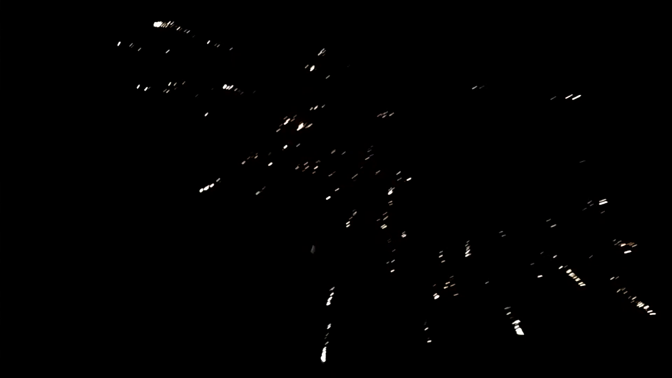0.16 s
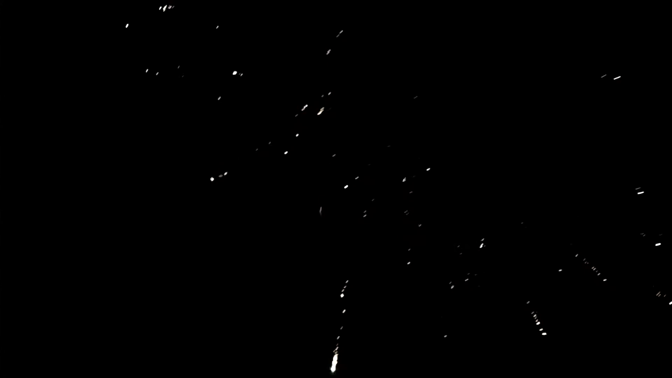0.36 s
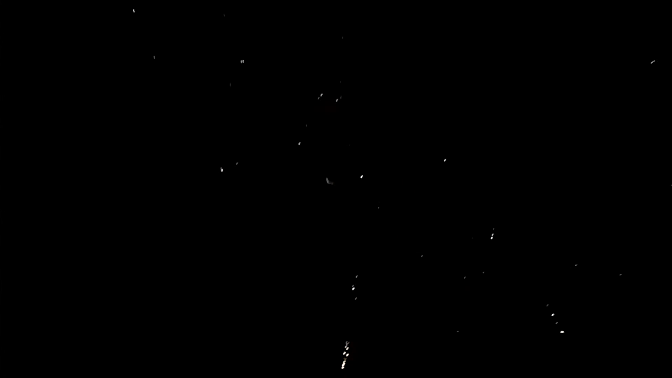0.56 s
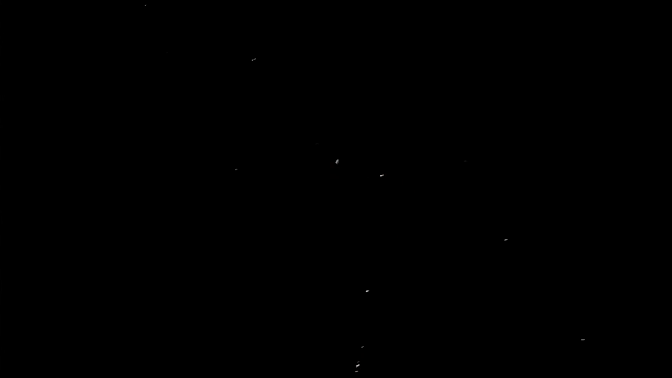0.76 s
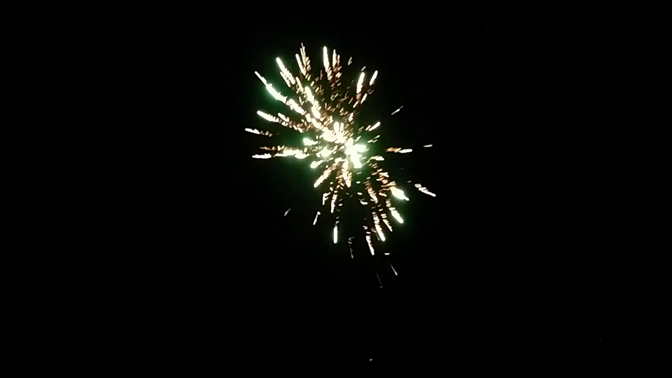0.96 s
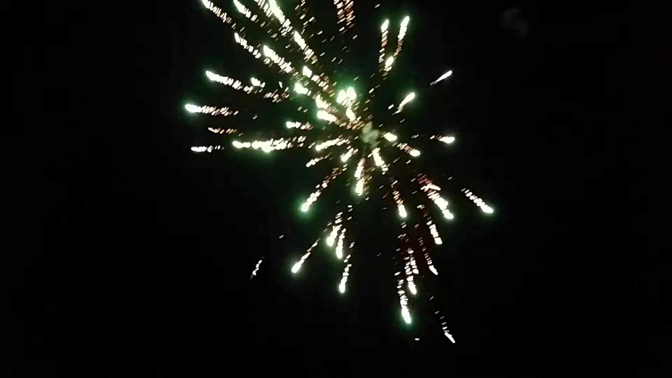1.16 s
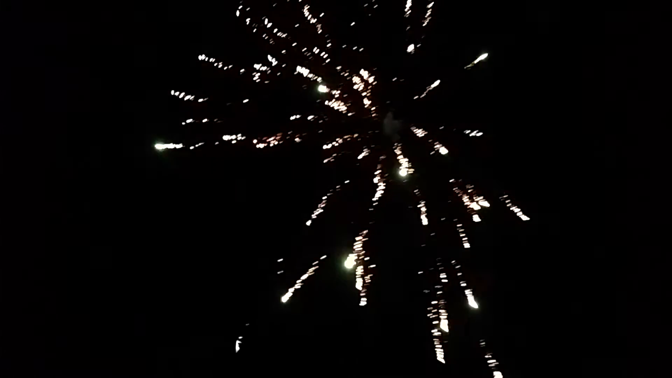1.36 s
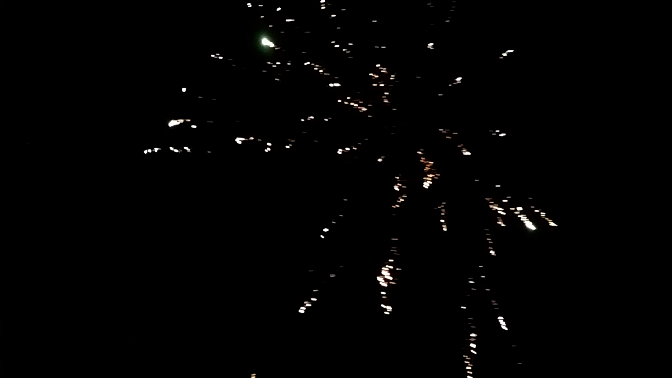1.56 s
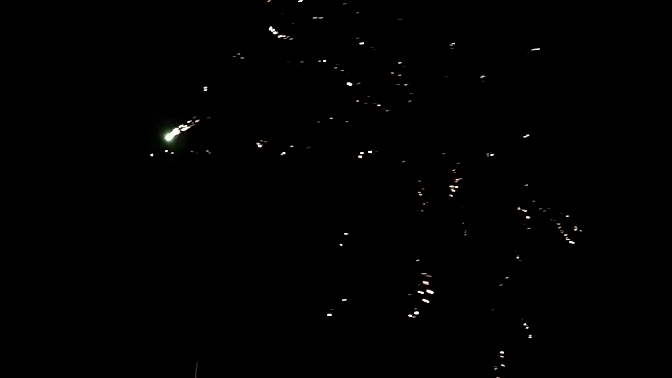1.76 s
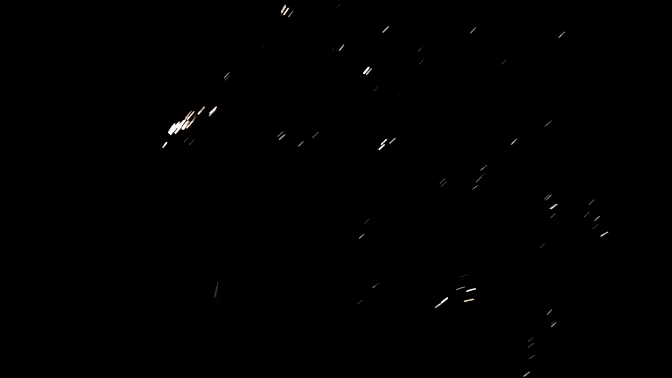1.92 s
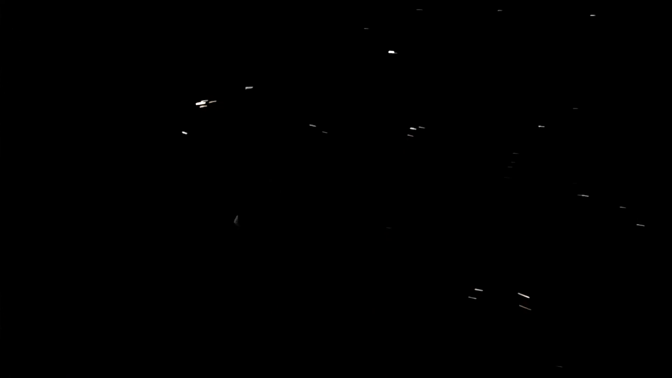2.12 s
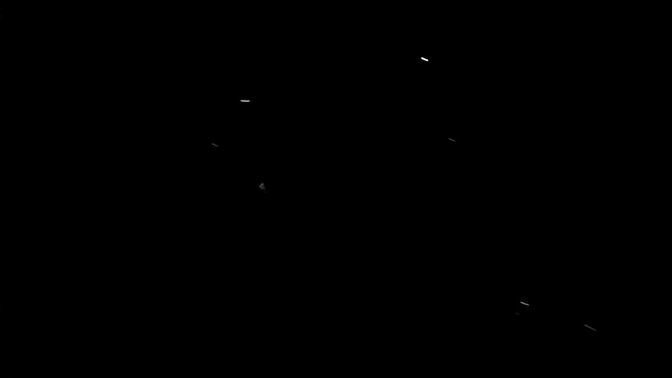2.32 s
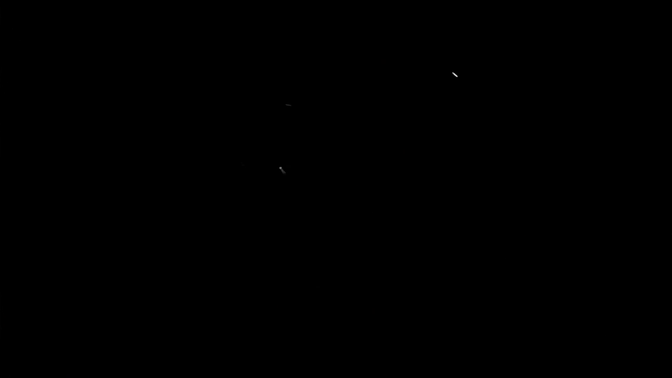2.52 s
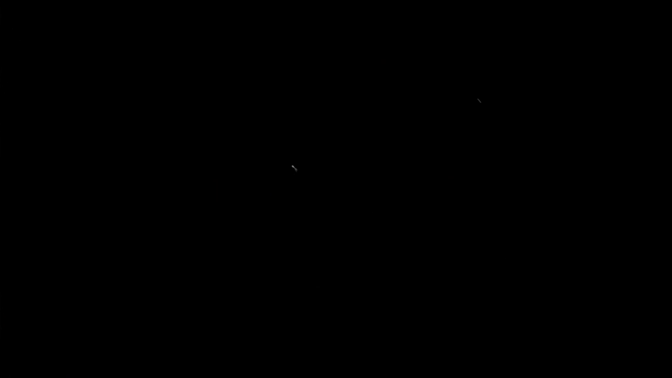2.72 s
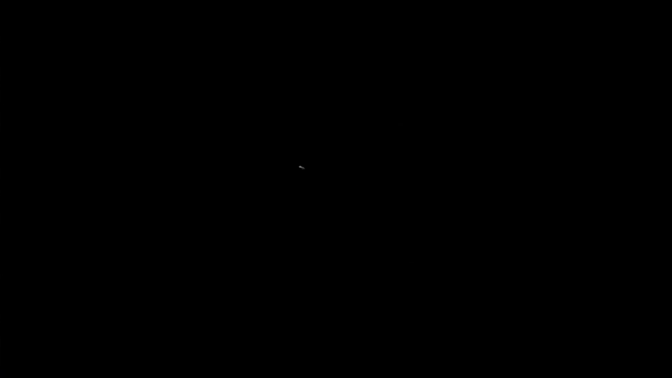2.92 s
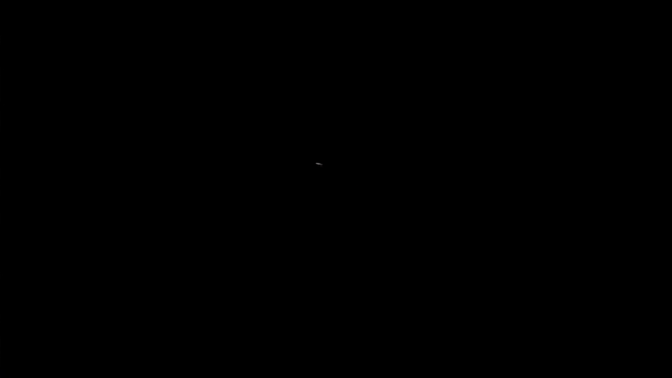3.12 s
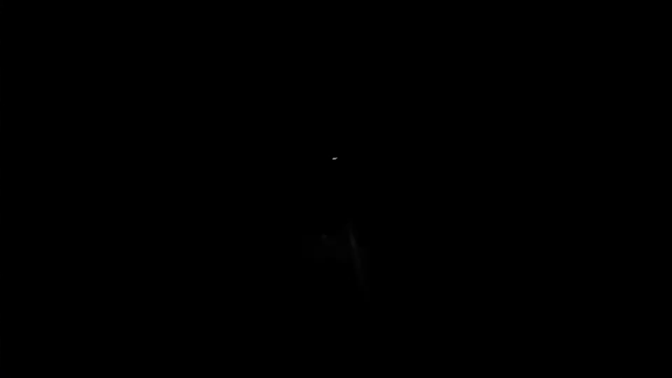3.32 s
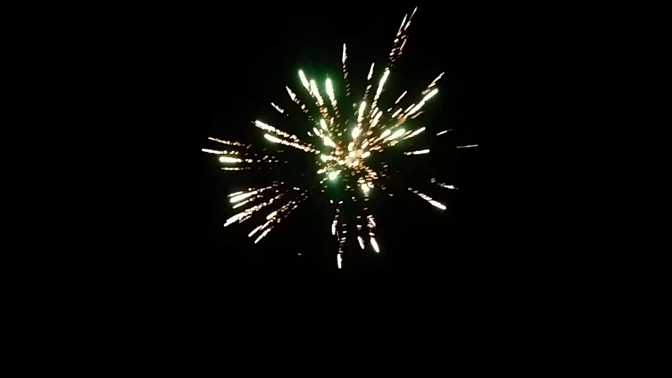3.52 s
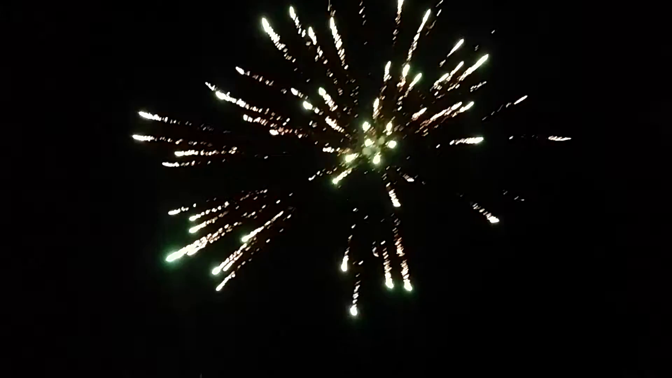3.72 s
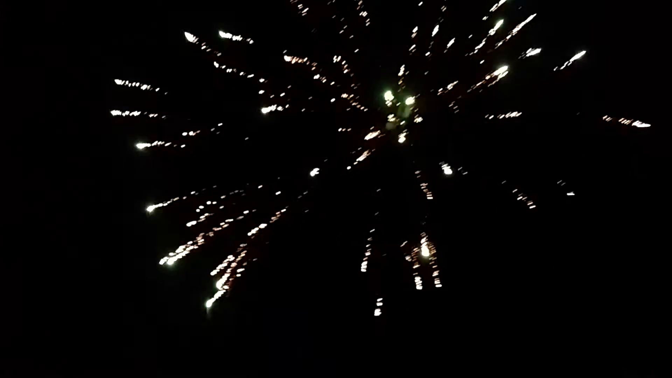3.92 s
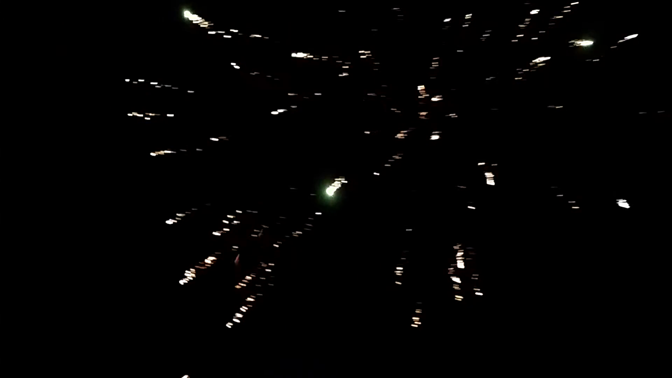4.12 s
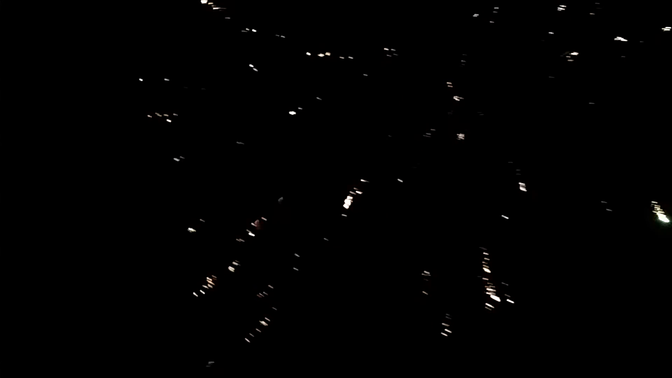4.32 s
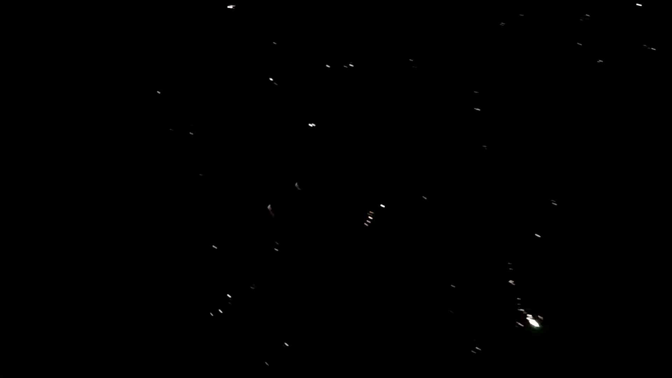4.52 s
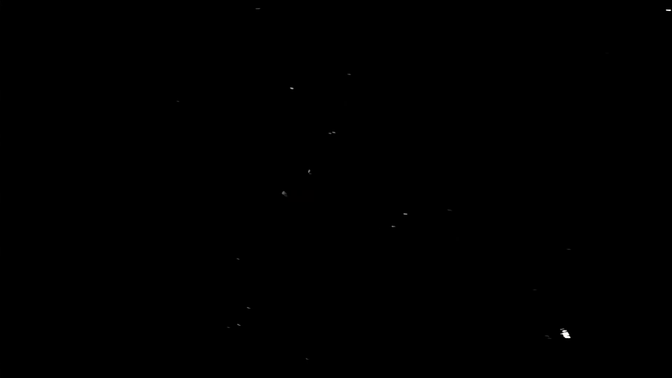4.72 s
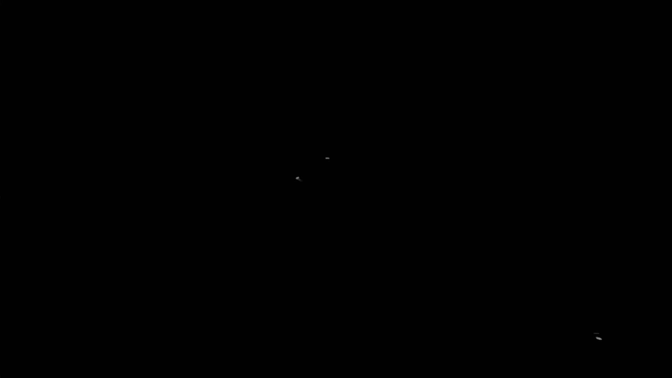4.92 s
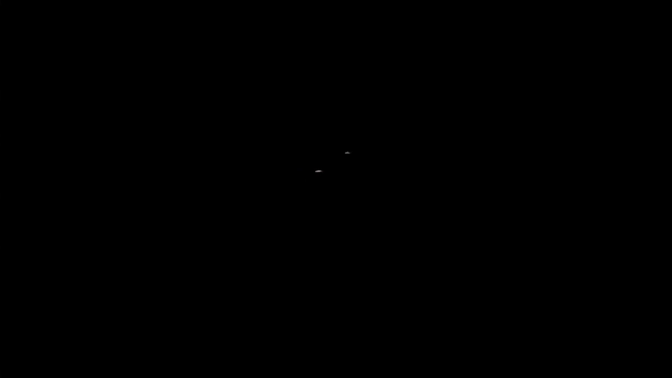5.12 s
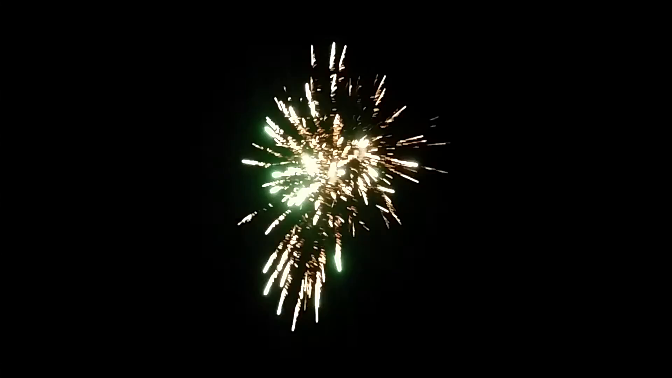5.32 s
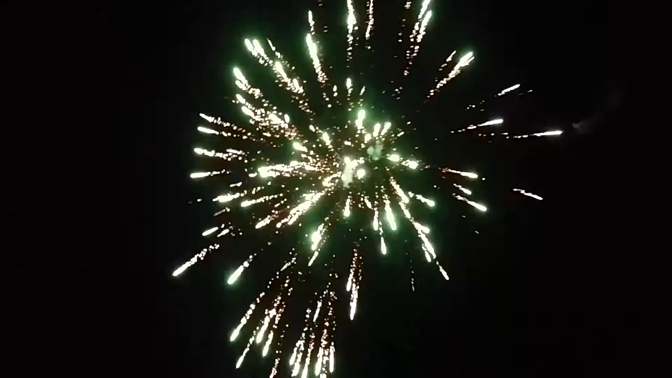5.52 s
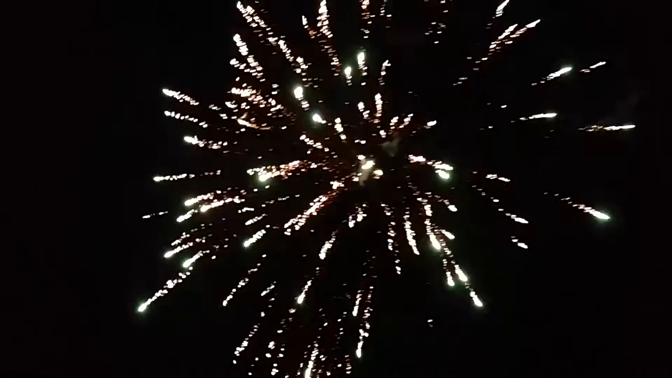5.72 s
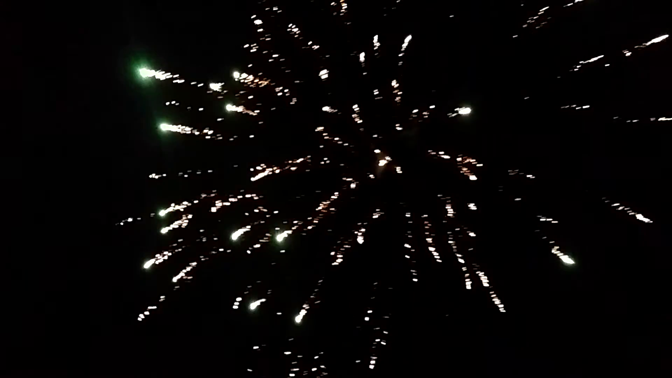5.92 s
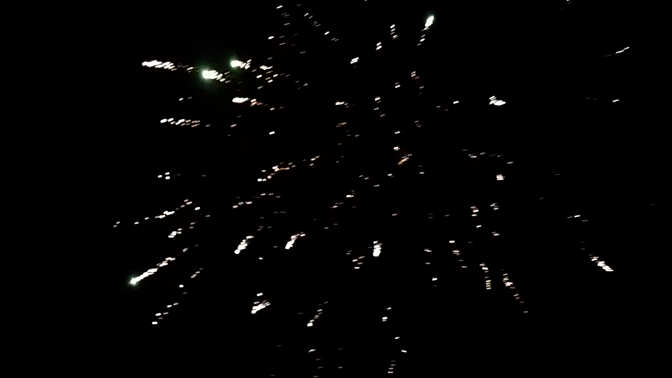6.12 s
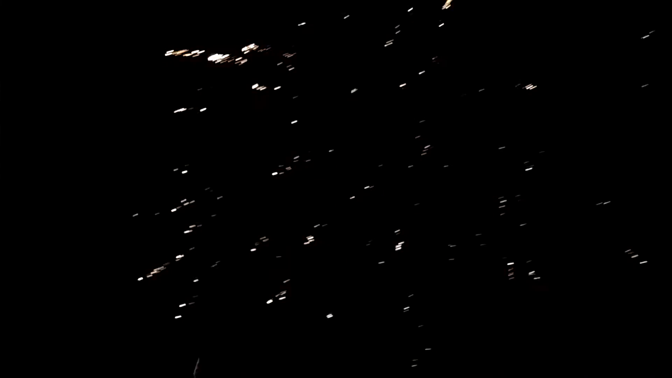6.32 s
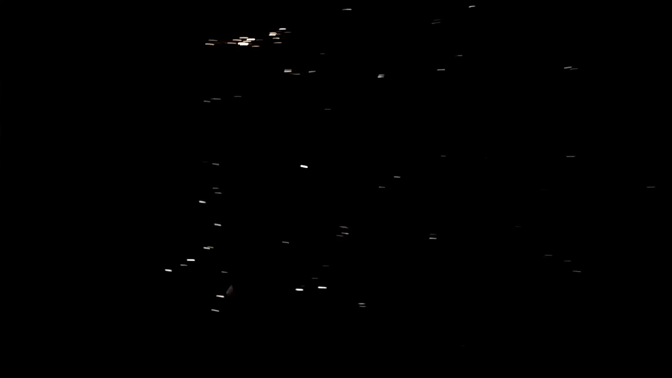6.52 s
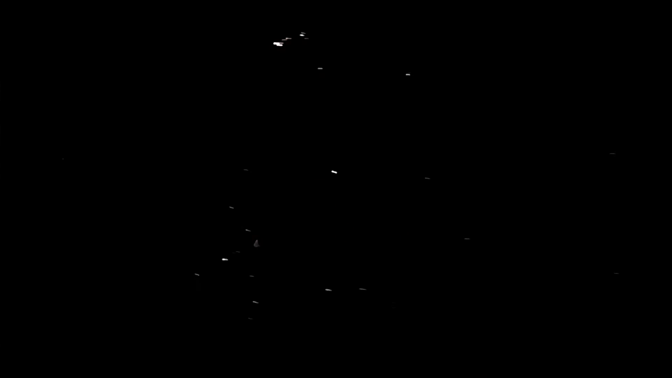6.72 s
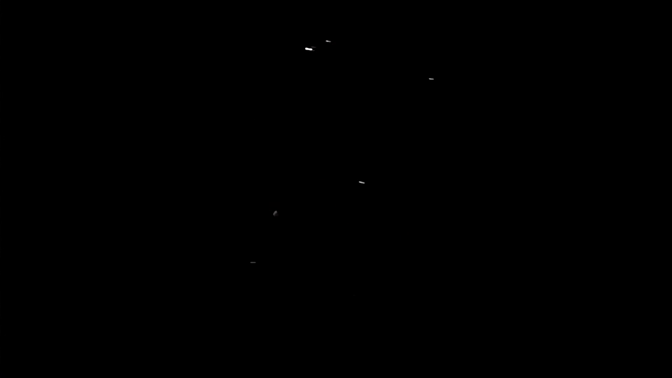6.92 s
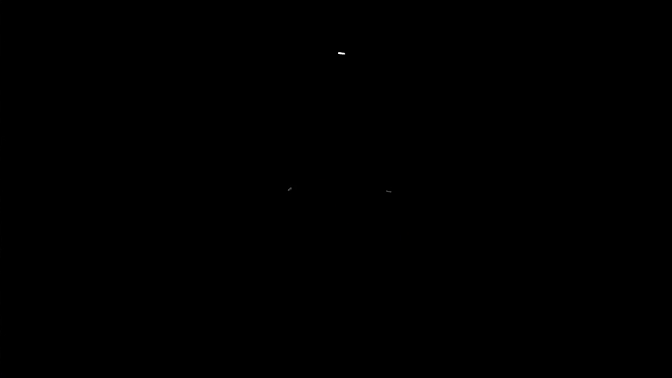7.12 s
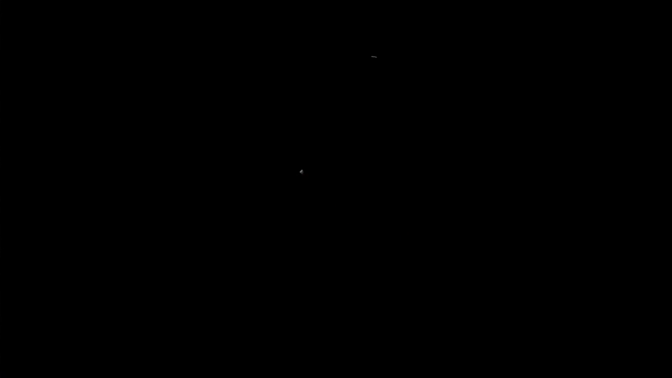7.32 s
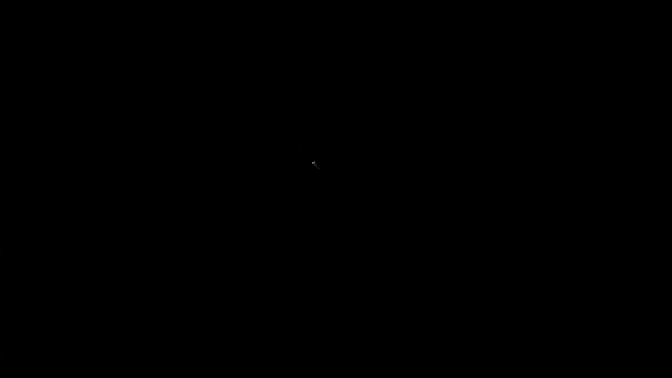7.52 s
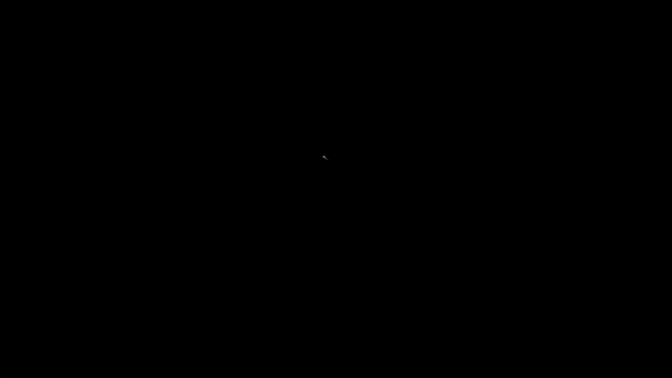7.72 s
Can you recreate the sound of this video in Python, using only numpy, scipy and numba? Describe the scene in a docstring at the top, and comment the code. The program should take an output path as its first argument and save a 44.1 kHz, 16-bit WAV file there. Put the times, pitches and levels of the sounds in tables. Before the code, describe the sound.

Outdoors, a firework shell bursts overhead with a sharp bang that echoes off the surroundings. A launch tube thumps and hisses faintly, then two more thump just before a second bang. Two further bangs come almost together, followed by one last thump and a fading hiss. The loud reports overload the microphone and briefly duck the background, while gusts of wind buffet it, mostly on the left.

```python
"""A firework cake outdoors at night, heard through two microphone ports buffeted by wind throughout.
At 1 s a shell already aloft bursts: a shock, a ground bounce, then echoes from the surroundings.
From 1.4 s tubes thump at ground level and their shells hiss upward; three burst about 2 s after launch.
The bangs overload the recorder, whose gain ducks and then lets the outdoor rush swell back.
A last tube fires at 5.9 s and its hiss fades."""
import sys
import numpy as np
from scipy import signal
from scipy.fft import rfft, irfft
from scipy.io import wavfile
from scipy.ndimage import uniform_filter1d
from numba import njit

SR = 44100
rng = np.random.default_rng(int(sys.argv[2]) if len(sys.argv) > 2 else 0)


def generate_wav(signal):
    """Clip the signal to [-1, 1] and save it as 16-bit WAV at the path in sys.argv[1]."""
    frames = np.transpose(np.atleast_2d(signal))
    scaled = np.clip(frames, -1, 1) * 32767
    pcm = np.round(scaled).astype(np.int16)
    wavfile.write(sys.argv[1], SR, pcm)


N = 342216
T = np.arange(N) / SR
HZ = np.maximum(np.arange(N // 2 + 1) * SR / N, 1)

# lift charges: (time [s], level [dB], push length [ms], crack re level [dB])
LAUNCHES = [(1.3759, 18, 0.4, -28), (3.317, 15, 0.39, -22), (3.3777, 20.5, 0.39, -24.5),
            (5.8502, 16.5, 0.56, -20)]
# shell bursts: (time [s], level [dB], N-wave length [ms], ground bounce lag [ms], echo level [dB])
BURSTS = [(1.0087, 18, 1.15, 8.8, -16.5), (3.5655, 20.5, 1.2, 8.85, -21.5),
          (5.3725, 19.5, 1.25, 8.8, -19.5), (5.4447, 17.5, 1.29, 9.05, -18.5)]
# gusts: (start [s], level [dB], length [s], left minus right [dB])
GUSTS = [(0.449, -23, 0.059, 31), (0.595, -22, 0.069, 28), (0.84, -21.5, 0.045, -44),
         (1.52, -31.5, 0.13, 25), (1.825, -19, 0.062, 28), (2.173, -17.5, 0.032, 32),
         (2.494, -23, 0.045, 14), (2.621, -30.5, 0.028, -3), (3.001, -21.5, 0.072, 31),
         (3.181, -21.5, 0.099, 29), (3.82, -16.5, 0.055, 18), (3.93, -17, 0.069, 15),
         (4.201, -10, 0.07, 30), (4.386, -22.5, 0.055, -12), (4.556, -18.5, 0.115, -1.5),
         (4.792, -18.5, 0.084, 38), (4.972, -22, 0.21, 35), (5.28, -15, 0.048, 25)]
# hard eddies at the windward port: (time [s], level [dB], centre [Hz])
HARD_EDDIES = [(1.827, -5.5, 214), (1.872, -12, 260), (2.186, -9.5, 231), (2.224, -14, 256),
               (3.19, -7.5, 302), (3.869, -4, 405), (3.957, -2, 650), (4.167, -2.5, 199), (4.225, -3, 234),
               (4.251, -3.5, 258), (4.332, -4, 270), (4.575, -10, 330), (4.782, -10.5, 298),
               (5.314, -0.5, 218)]
# breeze envelope: (time [s], relative level [dB], left minus right [dB])
BREEZE = [(.17, -31.5, 25), (.33, -65, 5), (0.698, -42, 2.5), (1.4, -53, -1.5), (2.4, -30.5, 13.5),
          (2.9, -50.5, 2), (3.249, -21, 7), (4.15, -25.5, 19), (4.7, -34.5, 9), (5.2, -30, 6),
          (5.549, -33.5, 9), (5.701, -30.5, 15), (6.219, -26, 18), (6.45, -56, -2)]
# noise spectra: (frequency [Hz], relative level [dB])
FUSE_SPECTRUM = [(1500, -8), (2100, -2), (3000, -6), (4500, 0), (6200, -4), (8200, 0), (11000, -7),
                 (13500, -5), (15500, -12)]
WASH_SPECTRUM = [(50, -7.5), (120, -2.5), (280, -0.5), (580, 2.5), (850, -2.5), (1250, -9), (1800, -6),
                 (3200, -12), (5000, -13), (9000, -21.5), (15000, -28.5)]
FAR_ECHO_SPECTRUM = [(40, -13.5), (140, -5), (350, -1), (500, -2), (690, 1), (1100, -11.5), (2500, -20.5),
                     (6000, -56)]
WIND_SPECTRUM = [(20, -27), (50, -4.5), (110, 9.5), (200, 4), (320, -14.5), (500, -22), (1000, -36),
                 (3000, -73)]
RUSH_SPECTRUM = [(18, -38), (30, -12.5), (75, 3), (139, -5.5), (167, -14.5), (195, -9.5), (374, -13.5),
                 (538, -16), (662, -12), (1060, -22.5), (1140, -21.5), (1240, -18.5), (2190, -19),
                 (3590, -35.5), (5000, -35), (15000, -46)]
# port colour: (frequency [Hz], left minus right [dB])
PORT_BALANCE = [(100, -0.5), (600, -4.5), (1500, -1.5), (2800, -6), (4200, 3), (6000, -1.5), (8000, 6.5),
                (11000, 4), (15000, 4.5)]


def undb(db):
    """Decibels to gain."""
    return 10 ** (np.asarray(db) / 20)


def unit(x):
    """Scale to rms 1."""
    return x / np.sqrt(np.mean(x ** 2))


def colour(points):
    """Gain per FFT bin from (Hz, dB) points."""
    hz, db = np.transpose(points)
    return undb(np.interp(np.log(HZ), np.log(hz), db))


def butter(x, hz, kind):
    """Causal second-order Butterworth filter."""
    return signal.sosfilt(signal.butter(2, hz, kind, fs=SR, output="sos"), x)


def noise(shape, hz, kind="band"):
    """Filtered noise, rms 1."""
    return unit(butter(rng.standard_normal(shape), hz, kind))


def port_noise(spectrum):
    """Coloured noise, independent per port, rms 1."""
    return unit(irfft(rfft(rng.standard_normal((2, N))) * colour(spectrum), N))


def diffuse_noise(spectrum, coherent_hz=620):
    """Noise from all around, rms 1: the ports share bass but not treble."""
    mid, side = rfft(rng.standard_normal((2, N)))
    coherence = .97 * np.exp(-(HZ / coherent_hz) ** 2)
    pair = mid * np.sqrt(1 + coherence) + side * np.sqrt(1 - coherence) * np.array([[1], [-1]])
    return unit(irfft(pair * colour(spectrum), N))


def add(out, start_s, x):
    """Mix x in at start_s."""
    i = max(int(start_s * SR), 0)
    out[..., i:i + x.shape[-1]] += x[..., :N - i]


def fade(t, t60_s):
    """Exponential decay from t = 0."""
    return np.exp(-np.log(1000) * np.maximum(t, 0) / t60_s) * (t >= 0)


def pan(pan_db):
    """Left and right gains; the louder port gets 1."""
    return undb(np.minimum(np.vstack([pan_db, -pan_db]), 0))


def from_left(x, lag_s=5 / SR):
    """A wave front that reaches the left port first."""
    t = T[:len(x)]
    return np.array([x, np.interp(t - lag_s, t, x, left=0)])


def bursts(ring_hz=(580, 440), boom_hz=70, bounce_db=-3.5):
    """An N-wave rings each port cavity and scatters nearby; its ground bounce adds a low boom."""
    out, t = np.zeros((2, N)), T[:SR // 8]
    shape = (2, len(t))
    for start_s, db, length_ms, bounce_ms, _ in BURSTS:
        age = t / (length_ms / 1000)
        n_wave = (1 - 2 * age ** .55) * (age < 1)
        shock = from_left(butter(n_wave, 150, "high"))
        ring = undb(-8) * pan(4) * np.cos(2 * np.pi * np.outer(ring_hz, t)) * fade(t, t60_s=.03)
        scatter = undb(-19) * noise(shape, [1000, 2000]) * fade(t, t60_s=.046)
        crack = undb(-17) * pan(7) * butter(rng.standard_normal(shape), 9900, "low") * fade(t, .017)
        boom = undb(-14.5) * np.cos(2 * np.pi * boom_hz * t) * fade(t, t60_s=.043)
        bounce = butter(shock, 8000, "low") + boom
        add(out, start_s, undb(db) * (shock + ring + scatter + crack))
        add(out, start_s + bounce_ms / 1000, undb(db + bounce_db) * bounce)
    return out


def launches(bounce_s=.0008, tube_hz=290):
    """Tube-mouth blast: a push and longer suction, with ground bounce, ring, scatter and gas crack."""
    out, t = np.zeros((2, N)), T[:SR // 4]
    for start_s, db, push_ms, crack_db in LAUNCHES:
        age = t / (push_ms / 1000)
        pressure = (1 - age) * np.exp(-.7 * age)
        blast = butter(butter(pressure, 2400, "low"), 130, "high")
        bounce = undb(-10) * np.interp(t - bounce_s, t, blast, left=0)
        ring = undb(-25) * np.sin(2 * np.pi * tube_hz * t) * fade(t, t60_s=.006)
        scatter = undb(-40) * noise(len(t), [180, 1500]) * fade(t, t60_s=.24)
        crack = undb(crack_db) * pan(11) * noise((2, len(t)), [4100, 9500]) * fade(t, t60_s=.012)
        add(out, start_s, undb(db) * (from_left(blast + bounce + ring + scatter) + crack))
    return out


def fuse_hiss(level_db=-46, catch_s=.056, t60_s=2.1):
    """Each fuse catches, hisses and fades as its shell climbs."""
    power = sum((np.clip((T - s) / catch_s, 0, 1) * fade(T - s, t60_s)) ** 2 for s, *_ in LAUNCHES)
    return undb(level_db) * np.sqrt(power) * port_noise(FUSE_SPECTRUM)


def near_echoes(gain_db=7, delay_s=.033, spread_s=.009):
    """Close walls and trees return each burst in a tight cluster."""
    cluster = sum(undb(db) * np.exp(-((T - s - delay_s) / spread_s) ** 2) for s, *_, db in BURSTS)
    return undb(gain_db) * cluster * unit(butter(diffuse_noise(WASH_SPECTRUM), [130, 1900], "band"))


def echo_wash(gain_db=2, build_s=.015, early_t60_s=.48, late_t60_s=1.14, grain_db=1.3):
    """Trees and houses scatter each burst: early splash, longer wash; air absorbs treble first."""
    spectrum = rfft(diffuse_noise(WASH_SPECTRUM))
    out, t = np.zeros((2, N)), T[:2 * SR]
    envelope = np.hypot(fade(t, late_t60_s), undb(6) * fade(t, early_t60_s)) * np.minimum(t / build_s, 1)
    for hz in 2. ** np.arange(5, 15):
        octave = irfft(spectrum * np.maximum(1 - abs(np.log2(HZ / hz)), 0), N)
        tail = envelope * fade(t, t60_s=20000 / hz)
        power = np.zeros(N)
        for start_s, *_, echo_db in BURSTS:
            add(power, start_s, (undb(echo_db) * tail) ** 2)
        out += octave * np.sqrt(power)
    grain = unit(uniform_filter1d(rng.standard_normal(N), size=130))  # single reflectors stand out
    return out * undb(gain_db + grain_db * grain)


def far_echo(level_db=-45, delay_s=1.65, spread_s=.34):
    """Each burst rolls back from far away, soft and dull."""
    power = sum(np.exp(-((T - s - delay_s) / spread_s) ** 2) for s, *_ in BURSTS)
    return undb(level_db) * np.sqrt(power) * diffuse_noise(FAR_ECHO_SPECTRUM)


def wind(fine_hz=340, lee_db=30):
    """Port turbulence: stronger wind sheds more fine eddies; hard eddies flick the left port."""
    strength = wind_strength()
    out = strength * turbulence()
    out += undb(-13) * strength ** 1.3 * eddy_stream(fine_hz, spread_db=3.5)
    t = T[:SR // 4] - 1 / 8
    for centre_s, db, hz in HARD_EDDIES:
        core = undb(-24) * vortex(t, 3 * hz)
        add(out, centre_s + t[0], undb(db) * pan(lee_db) * (vortex(t, hz) + core))
    return out


def wind_strength(breeze_trim_db=-2, flutter_db=4, flutter_hz=12, rise_s=.0061, fall_s=.024):
    """Pressure envelope per port: a restless breeze plus gusts that rise, hold and fall."""
    times_s, levels_db, pans_db = np.transpose(BREEZE)
    flutter = noise((2, N), flutter_hz, "low")
    breeze_db = np.interp(T, times_s, levels_db) + flutter_db * flutter + breeze_trim_db
    power = (undb(breeze_db) * pan(np.interp(T, times_s, pans_db))) ** 2
    t = T[:SR // 2]
    for start_s, db, length_s, pan_db in GUSTS:
        swell = np.minimum(t / rise_s, 1) * np.exp(-np.maximum(t - length_s, 0) / fall_s)
        add(power, start_s, (undb(db) * pan(pan_db) * swell) ** 2)
    return np.sqrt(power)


def turbulence():
    """Eddies of three sizes on a smoother rumble, levelled to a running rms of 1."""
    out = undb(-2) * port_noise(WIND_SPECTRUM)
    for hz, db in [(60, -6.5), (130, 1), (210, -12.5)]:
        out += undb(db) * eddy_stream(hz, spread_db=3)
    return out / np.sqrt(uniform_filter1d(out ** 2, size=3000))


def eddy_stream(hz, spread_db, rate_per_s=130):
    """Eddies of one width, random in time and strength, independent per port."""
    arrivals = rng.random((2, N)) < rate_per_s / SR
    kicks = arrivals * rng.standard_normal((2, N)) * undb(spread_db * rng.standard_normal((2, N)))
    eddy = vortex(T[:SR // 10] - 1 / 20, hz)
    return unit(signal.fftconvolve(kicks, eddy[None], "same", axes=1))


def vortex(t, hz):
    """Pressure of a passing eddy: the core sucks, the rim pushes."""
    distance_sq = (np.pi * hz * t) ** 2
    return (3 * distance_sq - 1) / (1 + distance_sq) ** 3


def outdoor_rush(level_db=-43):
    """Steady rush of night air and distant surroundings."""
    return undb(level_db) * diffuse_noise(RUSH_SPECTRUM)


def scene():
    """Sum at the two ports."""
    fireworks = launches() + fuse_hiss() + bursts()
    echoes = near_echoes() + echo_wash() + far_echo()
    return fireworks + echoes + outdoor_rush() + wind()


@njit
def slew(target, attack_s, release_s):
    """Follow a 0-1 target: exponential rise, linear fall that eases near zero."""
    out, level = np.empty(len(target)), target[0]
    for i in range(len(target)):
        if target[i] > level:
            level += (target[i] - level) / (SR * attack_s)
        else:
            level -= min(1., 3 * (level - target[i])) / (SR * release_s)
        out[i] = level
    return out


def gain_control(x, depth_db=13.5, attack_s=.039, hold_s=.91, release_s=.5, first_hold_s=.3):
    """Overload of both ports ducks the gain and holds it; the gain starts ducked."""
    overload = abs(x).min(axis=0) > 1
    last_overload_s = np.maximum.accumulate(np.where(overload, T, first_hold_s - hold_s))
    held = 1. * (T - last_overload_s < hold_s)
    return x * undb(-depth_db * slew(held, attack_s, release_s))


def record(dry, ceiling=.93, cutoff_hz=15800):
    """Port colour, gain control, clipping, treble cut-off."""
    port_gains = colour(PORT_BALANCE) ** np.array([[.5], [-.5]])
    ducked = gain_control(irfft(rfft(dry) * port_gains, N))
    clipped = ducked / (1 + (ducked / ceiling) ** 6) ** (1 / 6)
    return signal.sosfilt(signal.ellip(10, .1, 90, cutoff_hz, fs=SR, output="sos"), clipped)


dry = scene()
out = record(dry)
generate_wav(out)
```